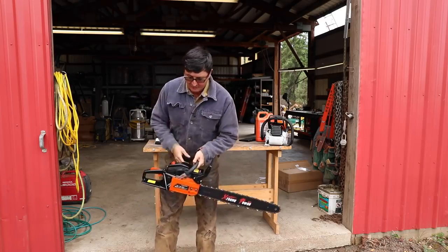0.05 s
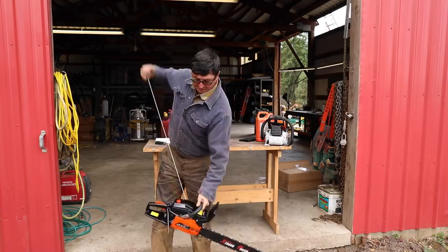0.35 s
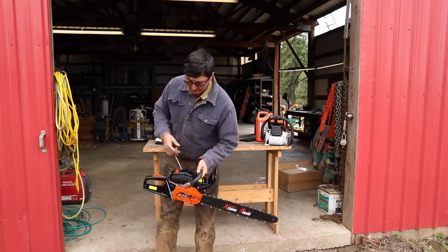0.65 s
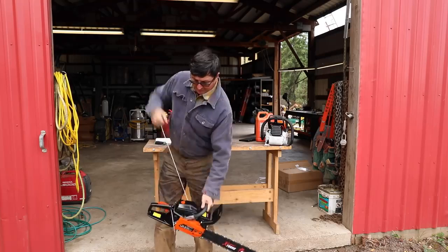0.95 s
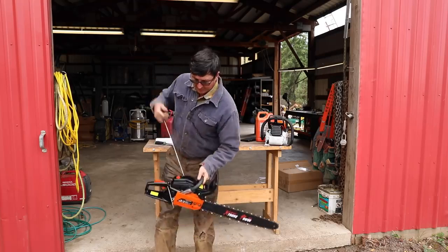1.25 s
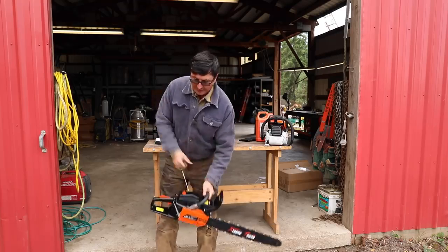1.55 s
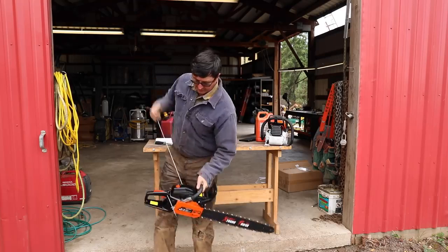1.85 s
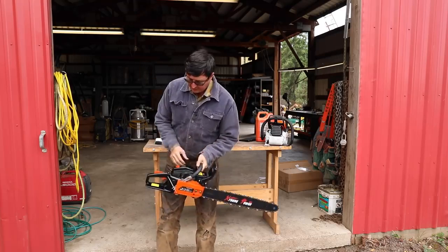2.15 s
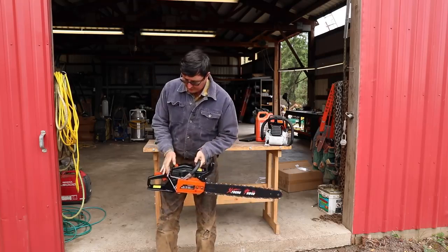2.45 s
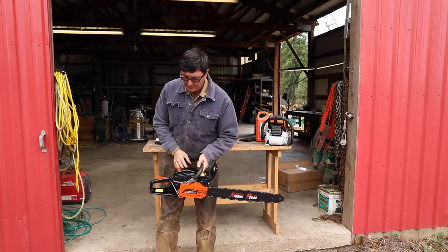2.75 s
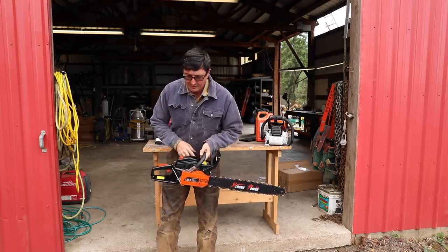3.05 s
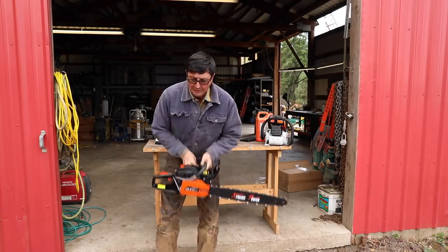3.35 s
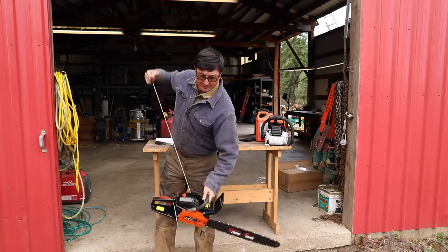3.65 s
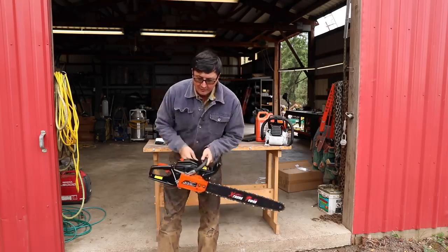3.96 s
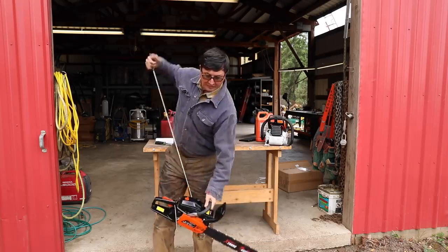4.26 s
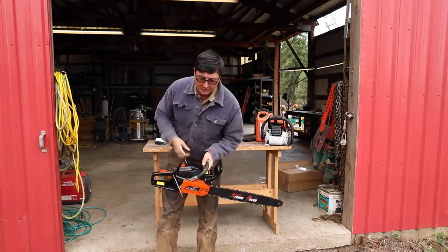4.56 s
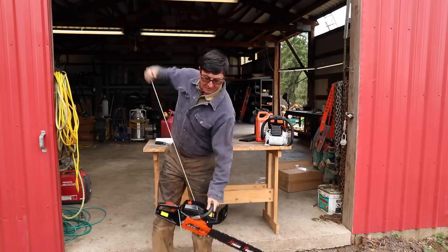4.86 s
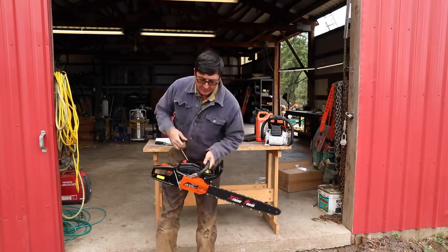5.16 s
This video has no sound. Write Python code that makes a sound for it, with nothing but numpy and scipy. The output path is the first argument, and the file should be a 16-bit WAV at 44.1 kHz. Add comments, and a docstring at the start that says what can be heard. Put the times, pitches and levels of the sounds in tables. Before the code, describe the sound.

A starter cord rattles back into a chainsaw, then is yanked three times. The small engine turns over with a rasping putter that dies at once, and each time the cord zips back and its handle slaps the plastic housing. A few switch clicks and a faint clothing rustle fill a pause before three more failed pulls. Heard from nearby in a quiet yard, with slight reflections from a shed.

```python
"""A chainsaw that will not start

A chainsaw is pull-started six times in front of an open shed and never fires. On each pull the pawls
catch with a knock, the cord rasps, the steel drive clanks and the piston puffs through the muffler
ever more slowly. The spring then rewinds with ticking pawls and the handle smacks home. In the pause
a switch is clicked and the saw is shifted. Impacts and friction excite the modes of plastic and steel."""
import sys
import numpy as np
from scipy import signal
from scipy.fft import rfft, irfft
from scipy.io import wavfile
from scipy.ndimage import uniform_filter1d

SR = 44100
rng = np.random.default_rng(int(sys.argv[2]) if len(sys.argv) > 2 else 0)


def store_pcm(level_fs):
    """Save levels as 16-bit WAV."""
    pcm = np.round(np.clip(level_fs, -1, 1) * 32767).astype(np.int16)
    wavfile.write(sys.argv[1], SR, np.atleast_2d(pcm).T)


N = 234380
TIME = np.arange(N) / SR
SHORT = TIME[:SR // 10]


def undb(db):
    """Amplitude ratio: a factor of ten for every 20 dB."""
    return 10 ** (np.asarray(db) / 20)


def add(out, start_s, x):
    """Superposition: x adds to out from start_s on."""
    i = max(int(round(start_s * SR)), 0)
    out[i:i + len(x)] += x[:max(N - i, 0)]


def follow(points):
    """Amplitude envelope: a smoothed gain through (time_s, level_db) points, silent outside them."""
    times, levels = np.transpose(points)
    gain = undb(np.interp(TIME, times, levels, left=-120, right=-120))
    return uniform_filter1d(gain, size=130)


def through(x, response):
    """Linear filtering: x is convolved with an impulse response scaled to unit energy."""
    return signal.oaconvolve(x, response / np.sqrt(np.sum(response ** 2)))[:len(x)]


def high_pass(x, hz, order=2):
    """High-pass filtering: the bass rolls off below hz."""
    return signal.sosfilt(signal.butter(order, hz, "high", fs=SR, output="sos"), x)


def body(colour, size=2048):
    """Minimum phase: folding the cepstrum gives a causal response with a (frequency_hz, gain_db) curve."""
    hz, db = np.transpose(colour)
    bins_hz = np.maximum(np.fft.rfftfreq(size, 1 / SR), 1)
    magnitude = undb(np.interp(np.log(bins_hz), np.log(hz), db))
    cepstrum = irfft(np.log(magnitude))
    cepstrum[1:size // 2] *= 2
    cepstrum[size // 2 + 1:] = 0
    return irfft(np.exp(rfft(cepstrum)))


def ring(modes):
    """Modal vibration: one damped sinusoid for each (frequency_hz, level_db, t60_s)."""
    t = TIME[:SR // 4]
    return sum(undb(db - 60 * t / t60) * np.sin(2 * np.pi * hz * t) for hz, db, t60 in modes)


def grit(slips_per_s, spread_db):
    """Stick-slip friction: random impulses of uneven size, scaled to rms 1."""
    hits = rng.random(N) < slips_per_s / SR
    signs = rng.choice([-1, 1], N)
    slips = hits * signs * undb(spread_db * np.clip(rng.standard_normal(N), -2, 2))
    return slips / np.sqrt(np.mean(slips ** 2))


def chatter(hold_s, fade_s):
    """Contact envelope: steady while two parts chatter, then decaying exponentially as they settle."""
    return np.exp(-np.maximum(SHORT - hold_s, 0) / fade_s)


def blow(envelope, response, size=16384):
    """Impact excitation: a noise burst drives a body, and the sound takes the energy of the envelope."""
    force = envelope * rng.standard_normal(len(envelope))
    sound = irfft(rfft(force, size) * rfft(response, size))
    return sound * np.sqrt(np.sum(envelope ** 2) / np.sum(sound ** 2))


# Spectrum of the quiet yard: frequency_hz, gain_db
YARD_COLOUR = [(15, -22), (25, 4), (39, -13), (270, -6), (394, -8), (1480, -10), (1650, -18), (1790, -11.5),
               (1940, -15), (10400, -28.5), (16000, -42)]


def yard(level_db=-55):
    """Ambient noise: a steady floor, strongest in the bass."""
    return undb(level_db) * through(rng.standard_normal(N), body(YARD_COLOUR))


# Modes of the rewind spring and pawls: frequency_hz, level_db
SPRING_MODES = [(3682,0),(3957,0),(4264,0),(4511,-4),(4813,4),(4883,2),(5168,2),(5636,-3),(7036,-4),(8323,-3),(8775,-6),(10444,0),(11606,0),(12360,-4),(13238,-6),(13733,-8),(14282,-6),(14702,-3),(15138,-4),(15364,-3)]


def spring_ring(pivot_hz=5000, pivot_t60_s=.1, damping=.53, tilt_db_per_octave=-1):
    """Frequency-dependent damping: high modes die sooner. The coiled band never lies the same way twice."""
    hz, db = np.transpose(SPRING_MODES)
    detune = .0025 * rng.standard_normal(len(hz))
    uneven_db = 2.5 * rng.standard_normal(len(hz))
    levels = db + uneven_db + tilt_db_per_octave * np.log2(hz / pivot_hz)
    return ring(zip(hz * (1 + detune), levels, pivot_t60_s * (pivot_hz / hz) ** damping))


def rewind_db(t, start_s, snap_s, home_s, build_db, fade_db):
    """Growth and decay: the level builds up to the snap, then falls, slowly at first, until home."""
    to_come = np.clip((snap_s - t) / (snap_s - start_s), 0, 1)
    gone = np.clip((t - snap_s) / (home_s - snap_s), 0, 1)
    return -build_db * to_come - fade_db * gone ** 1.47


def rewind_gain(start_s, snap_s, home_s, build_db, snap_db, fade_db):
    """Friction envelope of a rewind, with a short transient as the spring snaps tight."""
    t = np.linspace(start_s, home_s, num=60)
    gain = follow(np.c_[t, rewind_db(t, start_s, snap_s, home_s, build_db, fade_db)])
    add(gain, snap_s, undb(snap_db) * chatter(hold_s=.02, fade_s=.008))
    return gain


# Response to the pulley's rubbing: frequency_hz, gain_db
PULLEY_COLOUR = [(100,-22.5),(400,-15),(600,5.5),(720,-3),(900,8),(1200,-6.5),(2200,-3.5),(2550,4),(3400,-15.5),(6500,-29.5),(7600,-21),(11000,-25),(15500,-33)]
# Recoils of the spring:
# start_s, snap_s, home_s, tick_gap_s, rub_db, scrape_db, build_db, snap_db, twang_db
RECOILS = [(0, .04, .178, .018, -24.5, -25.5, 0, -8, -29),
           (.632, .714, .8702, .0165, -25.5, -24, 4, 0, -28),
           (1.322, 1.39, 1.56, .0167, -24.5, -25, 7, 4.5, -33),
           (1.987, 2.047, 2.176, .015, -24, -26, 1.5, -4, -28),
           (3.845, 3.92, 4.0505, .0145, -24.5, -25, 2, -5, -30),
           (4.515, 4.6575, 4.7305, .013, -24, -28, 11, -1, -11),
           (5.118, 5.28, 5.423, .016, -26.5, -27, 5, -8, -35)]
RUB_FADE_DB, SCRAPE_FADE_DB = 15.5, 19.5


def rewind():
    """Sliding friction: as the spring coils back, the pulley rubs and the band scrapes; the pawls tick."""
    springs = [spring_ring() for _ in RECOILS]
    grain = grit(slips_per_s=3600, spread_db=11)
    pressure, slips = np.zeros(N), []
    for *span, _, rub_db, scrape_db, build_db, snap_db, _ in RECOILS:
        pressure += undb(rub_db) * rewind_gain(*span, build_db, snap_db, RUB_FADE_DB)
        slips.append(undb(scrape_db) * rewind_gain(*span, build_db, snap_db, SCRAPE_FADE_DB) * grain)
    rub = pressure * through(grit(slips_per_s=1400, spread_db=2.5), body(PULLEY_COLOUR))
    scrape = sum(through(slip, spring) for slip, spring in zip(slips, springs))
    band = body([(2000, -27), (4000, -1.5), (5600, 10), (6600, -9.5), (7600, -10), (9800, -11.5),
                 (12400, 1), (13300, -9.5), (15200, -4.5)])
    sizzle = through(sum(slips), band)
    return undb(-1) * (rub + scrape) + undb(-4) * sizzle + pawl_ticks(springs)


def pawl_slips(count=24, base_db=-21.5, tracking=.55, scatter_db=1.8, widening_s=.013):
    """Deceleration: yields (time_s, level_db) for each slip, wider apart as the pulley slows near home."""
    for start_s, snap_s, home_s, gap_s, _, _, build_db, _, _ in RECOILS:
        gaps = gap_s + widening_s * np.exp(-np.arange(count) / 1.5)
        times = home_s - (np.cumsum(gaps) - gaps)  # counted back from home
        levels = base_db + tracking * rewind_db(times, start_s, snap_s, home_s, build_db, RUB_FADE_DB)
        levels += scatter_db * rng.standard_normal(count)
        yield from np.c_[times, levels][times > start_s]


def pawl_ticks(springs, click_db=3, ping_db=1):
    """Ratchet impacts: each slipping pawl clicks and excites the modes of the spring."""
    out = np.zeros(N)
    pawl = body([(200, -4.5), (900, 4.5), (2500, 5), (4000, 3), (6200, 2), (7800, -11), (15000, -13.5)])
    contact = chatter(hold_s=.00065, fade_s=.0023)
    for k, (start_s, db) in enumerate(pawl_slips()):
        ping = undb(ping_db) * blow(contact, springs[k % len(springs)])
        click = undb(click_db) * blow(contact, pawl)
        add(out, start_s, undb(db) * (click + ping))
    return out


def twangs():
    """Beating: two close modes of the spring sing on when the band snaps tight."""
    out = np.zeros(N)
    pair = ring([(4803, -2, .36), (4882, -6, .3)])
    for _, snap_s, *_, twang_db in RECOILS:
        add(out, snap_s, undb(twang_db) * pair)
    return out


# Hollow modes of the plastic housing: frequency_hz, level_db, t60_s
HOUSING_MODES = [(605,-5,.04),(780,-3,0.045),(1010,-3,0.057),(1370,-3.5,0.029),(1873,0.5,0.02),(2350,0.5,0.021),(2360,10.5,0.014),(3200,-5.5,0.018)]


def knocks(blows, colour, fade_s, note_db, note_t60_s, spring_db, hollow_db=-9):
    """Shell resonance: a blow gives a crack, hollow modes, the struck spot's note and a trace of spring."""
    out = np.zeros(N)
    crack, hollow, spring = body(colour), ring(HOUSING_MODES), spring_ring()
    for start_s, db, pitch_hz, chatter_s in blows:
        contact = chatter(chatter_s, fade_s)
        note = ring([(pitch_hz, 0, note_t60_s)])
        parts = [(0, crack), (hollow_db, hollow), (note_db, note), (spring_db, spring)]
        knock = sum(undb(part_db) * blow(contact, part) for part_db, part in parts)
        add(out, start_s, undb(db) * knock)
    return high_pass(out, hz=300)


# Response of the housing to the handle: frequency_hz, gain_db
HANDLE_COLOUR = [(120, -56), (200, -42), (883, 5.5), (1160, 2), (1650, -9.5), (2210, -1), (3190, -2.5),
                 (4200, -15), (5940, -9.5), (8900, -21.5), (9580, -31), (12400, -23.5), (16000, -41.5)]
# The handle smacking home: start_s, level_db, pitch_hz, chatter_s
HANDLE_SMACKS = [(0.1901, -10, 950, 0.0016), (0.8786, -7, 920, 0.0015), (1.571, -11, 970, 0.0082),
                 (2.1899, -11.5, 2733, .001), (4.0578, -13, 995, 0.0064), (4.7377, -6, 990, 0.0014),
                 (5.2125, -21.5, 920, 0.0096)]


def handle_smacks(lead_s=.0075, brush_db=-18):
    """Double impact: the returning handle brushes the housing, then strikes it."""
    brushes = [(start_s - lead_s, db + brush_db, hz, .006) for start_s, db, hz, _ in HANDLE_SMACKS]
    blows = HANDLE_SMACKS + brushes
    return knocks(blows, HANDLE_COLOUR, fade_s=.0027, note_db=-11, note_t60_s=.02, spring_db=-27)


# Hands and jacket bumping the saw: start_s, level_db, pitch_hz, chatter_s
SOFT_BUMPS = [(0.267, -42, 1300, 0.013), (3.349, -46, 170, .0034), (3.442, -45.5, 220, 0.015),
              (3.466, -38, 936, 0.0026), (3.491, -43, 300, 0.05), (4.084, -42, 875, 0.023),
              (4.158, -45.5, 110, 0.025)]
# Clothes rustling as the saw is shifted: time_s, level_db
RUSTLE_CURVE = [(3.3,-68),(3.4,-51.5),(3.48,-73),(3.53,-65)]


def handling(bump_t60_s=.01):
    """Friction and damped impact: a jacket rustles, and soft bumps on the saw die away at once."""
    cloth = body([(25, 7), (60, 5), (200, -.5), (600, -8), (1300, -8), (1800, -17.5), (7000, -13),
                  (16000, -19)])
    thud = body([(60, 2), (1200, 8.5), (2000, -7), (16000, -17)])
    out = follow(RUSTLE_CURVE) * through(grit(slips_per_s=2400, spread_db=7.5), cloth)
    for start_s, db, pitch_hz, chatter_s in SOFT_BUMPS:
        contact = chatter(chatter_s, fade_s=.0066)
        note = blow(contact, ring([(pitch_hz, 0, bump_t60_s)]))
        add(out, start_s, undb(db) * (note + .43 * blow(contact, thud)))
    return out


# Response of the housing to the catching pawls: frequency_hz, gain_db
PAWL_CATCH_COLOUR = [(120, -41.5), (200, -40.5), (456, -12.5), (763, 3.5), (1060, -5), (1420, 0),
                     (3130, -7.5), (4680, -10.5), (6520, -19), (7140, -4), (7680, -21.5), (12600, -19.5),
                     (16000, -33)]
# Pawls catching: start_s, level_db, pitch_hz, chatter_s
PAWL_CATCHES = [(0.3079,-12,1290,0.0015),(0.9768,-7,1350,0.00081),(1.6443,-8,770,0.0027),(3.53,-8.5,1330,0.0049),(4.1954,-8.5,1280,0.0035),(4.818,-8.5,687,0.0012)]


def pawl_catches():
    """Impulsive loading: the cord goes taut and the pawls catch, ringing housing and spring."""
    return knocks(PAWL_CATCHES, PAWL_CATCH_COLOUR, fade_s=.0033, note_db=-4.5, note_t60_s=.043,
                  spring_db=-7)


STALL_TURN_S = .08  # the crank stops after its first turn this long


def crank(first_s, fastest_s, driven_turns, slowing_s, spin_up_turns=.62, let_go_turns=.51):
    """Inertia: the crank spins up, then coasts. Returns compression times and the period after each."""
    k = np.arange(14)
    spin_up_s = .00317 * np.exp(-k / spin_up_turns)
    coasted_turns = let_go_turns * np.logaddexp(0, (k - driven_turns) / let_go_turns)
    periods = fastest_s + spin_up_s + slowing_s * coasted_turns
    periods = periods[:np.sum(periods < STALL_TURN_S) + 1]
    return first_s + np.cumsum(periods) - periods, periods


def surges(depth_db=2.5, rate_hz=110):
    """Random amplitude modulation: the cord scrapes unevenly."""
    steps = rng.standard_normal(N // 100)
    return undb(depth_db * np.interp(TIME * rate_hz, np.arange(len(steps)), steps))


# Spectrum of the cord's rasp, shared by the piston's hiss: frequency_hz, gain_db
RASP_COLOUR = [(60,-22),(300,4.5),(500,4.5),(680,-3.5),(840,4.5),(1200,-7.5),(2200,-4.5),(2600,-4),(3400,-4.5),(5500,-11.5),(7600,-19),(12500,-23.5),(16000,-25)]
# Pulls of the cord: first_compression_s, fastest_turn_s, driven_turns, slowing_s_per_turn,
# puff_db, puff_fade_db_per_turn, early_puff_db, clank_db, rasp_db
STARTER_PULLS = [(.3628, .02675, 4.46, .01804, -4, .7, -15.5, -10, -23),
                 (1.0271, .02641, 5.31, .017, -3.4, .75, -35, -9, -23.5),
                 (1.693, .02606, 5.29, .01688, -3.4, .75, -35, -11.5, -22.5),
                 (3.5747, .02694, 4.7, .02043, -3.4, .8, -35, -12, -22.5),
                 (4.2454, .02608, 4.69, .01911, -2.6, .85, -35, -8.5, -23),
                 (4.8725, .02609, 4.6, .01101, -3, .4, -12.5, -10.5, -22.5)]


def cord(take_up_db=-11, db_per_octave=8.5, kick_db=-28.5, slack_db=-40, rumble_db=-17):
    """Speed-dependent friction: the cord rasps in its eyelet and the saw shakes, louder at speed."""
    effort = np.zeros(N)
    for (*motion, _, _, _, _, rasp_db), (catch_s, *_) in zip(STARTER_PULLS, PAWL_CATCHES):
        times, periods = crank(*motion)
        levels = rasp_db - db_per_octave * np.log2(periods / periods.min())
        effort += follow([(catch_s, rasp_db + take_up_db), *zip(times, levels)])
        add(effort, times[-2], undb(kick_db) * chatter(0, fade_s=.022))  # kickback before the stop
    effort *= surges()
    for catch_s, *_ in PAWL_CATCHES:  # the slack runs out softly around each catch
        effort += undb(slack_db) * np.exp(-np.abs(TIME - catch_s) / .01384)
    rasp = through(grit(slips_per_s=2000, spread_db=5), body(RASP_COLOUR))
    frame = body([(20, -12.5), (40, 4.5), (90, -10), (150, 5.5), (300, 0), (900, -29), (4000, -78.5)])
    rumble = through(rng.standard_normal(N), frame)
    return effort * (rasp + undb(rumble_db) * rumble)


def compressions(stall_db=15.5, stall_curve=2.5):
    """Energy loss: yields (time_s, level_db, period_s) for each stroke, weaker as the crank slows."""
    for *motion, puff_db, fade_db, early_db, _, _ in STARTER_PULLS:
        times, periods = crank(*motion)
        shortest_s = periods.min()
        yield times[0] - shortest_s, early_db, shortest_s  # a feeble puff one turn early
        for k, time_s in enumerate(times):
            stalling = (periods[max(k - 1, 0)] - shortest_s) / (STALL_TURN_S - shortest_s)
            yield time_s, puff_db - fade_db * k - stall_db * stalling ** stall_curve, periods[k]


def piston(muffler_hz=280, muffler_t60_s=.011, intake_turn=.371, intake_gain=.29, puff_db=5, hiss_db=-16):
    """Cavity resonance: each shove of air rings the muffler and hisses; a softer intake gulp follows."""
    puffs, hiss = np.zeros(N), np.zeros(N)
    lead_s = .01
    t = SHORT - lead_s
    muffler = np.cos(2 * np.pi * muffler_hz * SHORT) * undb(-60 * SHORT / muffler_t60_s)
    gas = body(RASP_COLOUR)
    for time_s, db, period_s in compressions():
        width_s = .00031 * undb(-.87 * (db + 5))  # weak, slow strokes push for longer
        push = np.exp(-.5 * (t / width_s) ** 2)
        suction = .22 * np.exp(-.5 * ((t + .0023) / (2 * width_s)) ** 2)
        puff = signal.fftconvolve(push - suction, muffler)[:len(t)]
        puff *= undb(db + puff_db) / np.ptp(puff)
        add(puffs, time_s - lead_s, puff)
        gulp = intake_gain * uniform_filter1d(puff, size=30)
        add(puffs, time_s - lead_s + intake_turn * min(period_s, .06), gulp)
        add(hiss, time_s + .002, undb(db + hiss_db) * blow(chatter(.004, .0063), gas))
    return high_pass(puffs, hz=125, order=3) + hiss  # the small outlet radiates little bass


# Modes of the steel drive: frequency_hz, level_db, base_t60_s
STEEL_MODES = [(3630,-9,.05),(3960,-6,.05),(4655,-3,.09),(4705,0,.1),(4982,-1,.09),(5720,-10,.045),(6890,-15,.03),(8055,-10,.05),(12250,-16,.02),(14800,-16,.02)]


def clanks(jolts, low_db, sustain, ring_db, crack_db):
    """Free vibration of jolted steel: low_db shifts the low modes' level, sustain scales decay times."""
    out = np.zeros(N)
    crack = body([(500, -28.5), (2500, -21), (4500, 8.5), (7000, -1), (10000, -8.5), (15500, -3.5)])
    steel = ring([(hz, db + low_db * (hz < 4300), t60 * sustain) for hz, db, t60 in STEEL_MODES])
    for start_s, db, chatter_s in jolts:
        contact = chatter(chatter_s, fade_s=.0066)
        add(out, start_s, undb(db + ring_db) * blow(contact, steel))
        add(out, start_s, undb(db + crack_db) * blow(contact, crack))
    return out


# Loose jolts as the cord runs out or is checked: start_s, level_db, chatter_s
LOOSE_JOLTS = [(.4855, -21, 0.012), (.583, -29.5, 0.018), (1.166, -19, 0.014), (1.2324, -25.5, 0.0032),
               (1.8308, -19.5, .012), (1.8927, -27, 0.0036), (3.6978, -20, 0.012), (4.3624, -16.5, 0.0052),
               (4.4545, -26.5, 0.0094), (4.6578, -18, .012), (4.966, -19, .0072), (5.122, -29, 0.011)]


def drive(lag_s=.0056, chatter_s=.0027):
    """Metal impact: a bright clank just after each first compression, duller ones as the pull ends."""
    spin_ups = [(first_s + lag_s, clank_db, chatter_s) for first_s, *_, clank_db, _ in STARTER_PULLS]
    bright = clanks(spin_ups, low_db=-11.5, sustain=.89, ring_db=3.5, crack_db=-1)
    dull = clanks(LOOSE_JOLTS, low_db=13, sustain=.54, ring_db=.5, crack_db=2)
    return bright + dull


# Response of the housing to the switch: frequency_hz, gain_db
CLICK_COLOUR = [(88, -56), (150, -22.5), (923, -9), (1600, -8), (1940, -8.5), (2310, -2.5), (2760, 1),
                (3700, -8), (6260, -14), (7470, -16.5), (16000, -45.5)]
# Clicks of the switch: start_s, level_db, pitch_hz, chatter_s
SWITCH_CLICKS = [(2.2525,-40,1000,0.01),(2.2602,-19.5,1040,0.0014),(2.2972,-5,1970,0.0022),(2.5375,-38.5,2530,0.0027),(2.5505,-17,2920,0.0012)]


def switch():
    """Brief contact, broad spectrum: the switch clicks on the housing and barely stirs the spring."""
    return knocks(SWITCH_CLICKS, CLICK_COLOUR, fade_s=.002, note_db=-4, note_t60_s=.02, spring_db=-48.5)


def shed(x, near_db=-24, near_t60_s=.012, tail_db=-29, tail_t60_s=.25):
    """Reverberation: saw, body and door scatter the sound at once; the open shed adds a dull tail."""
    t = TIME[:SR]
    near = rng.standard_normal(SR) * undb(-60 * t / near_t60_s)
    walls = body([(60, -5), (500, -.5), (2000, -9.5), (3200, -6.5), (6000, -9), (16000, -17)])
    diffuse = through(rng.standard_normal(SR), walls)
    onset = np.clip(t / .0049, 0, 1)
    tail = diffuse * onset * undb(-60 * t / tail_t60_s)
    return undb(near_db) * through(x, near) + undb(tail_db) * through(x, tail)


def scene():
    """Superposition: the saw's direct sound, its reflections and the quiet yard add in one channel."""
    saw = piston() + cord() + rewind() + twangs() + drive() + handling()
    saw += pawl_catches() + handle_smacks() + switch()
    return (saw + shed(saw) + yard())[None]


def record(dry, top_hz=15900):
    """Clipping and band limiting: peaks flatten at full scale, then a steep low-pass cuts the top."""
    low_pass = signal.ellip(10, .1, 80, top_hz, fs=SR, output="sos")
    return signal.sosfilt(low_pass, np.clip(dry, -1, 1))


dry = scene()
out = record(dry)
store_pcm(out)
```